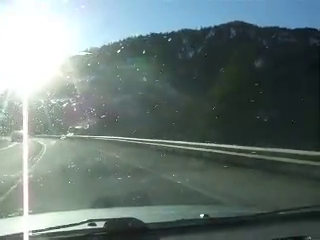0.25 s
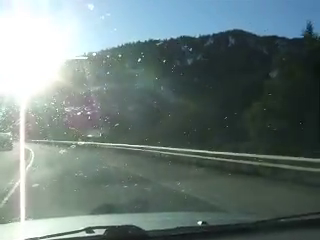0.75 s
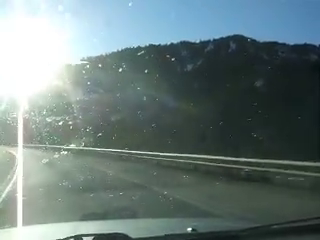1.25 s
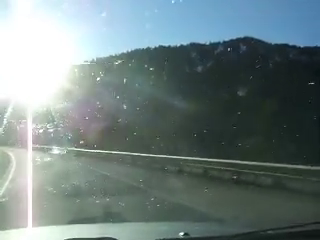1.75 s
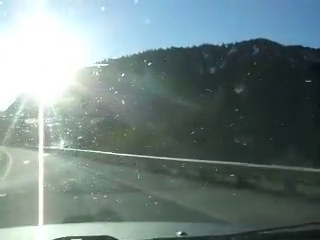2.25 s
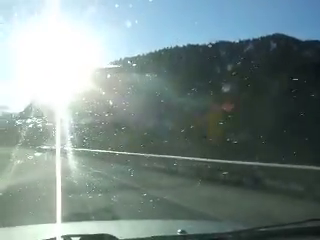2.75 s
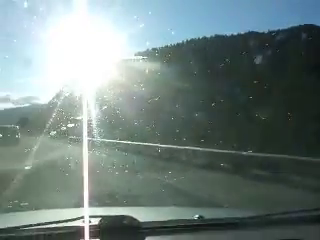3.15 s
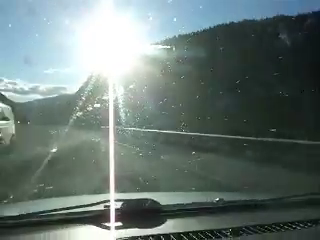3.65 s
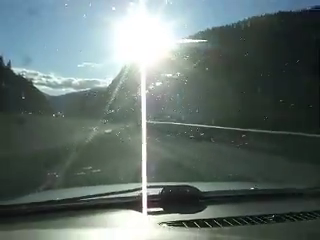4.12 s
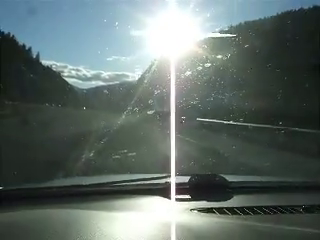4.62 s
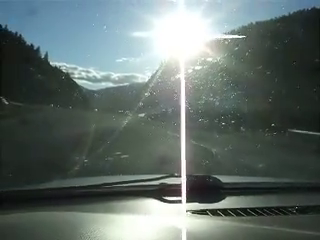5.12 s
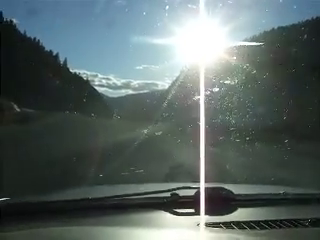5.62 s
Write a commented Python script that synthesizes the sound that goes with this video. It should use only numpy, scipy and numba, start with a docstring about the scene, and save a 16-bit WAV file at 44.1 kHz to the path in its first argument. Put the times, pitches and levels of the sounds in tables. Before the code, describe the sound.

From the start, loud wind and road noise fills a car cabin through an open window, captured by a small camera with a dulled top end. It is a broad, rough rumble and hollow roar with weaker hiss, fluttering quickly; a low engine hum sits half buried. The rush sags slightly around 0.7 and 1.2 seconds, then a cluster of gusts bursts at about 1.7 to 1.9. Smaller gusts follow near 2.5 and 2.7. From 2.8 the level ducks and recovers in uneven pulses, with a low gust near 3.4. Around 3.8 it drops again, with sharp, short gusts up to 4.0. At about 4.5 the strongest surge abruptly chokes the sound, leaving thin faint hiss near 4.65. The roar swells back over the following half second or so, with smaller dips around 4.8 to 5.3, then continues somewhat weaker, with faint gusts near 5.7, until the cut at six seconds.

```python
"""Wind rushes and hisses unevenly through the open window of a car on a highway, heard on a small camera inside.
Filtered noise in three eddy sizes rings the cabin's resonances; gusts add short noise bands, a sine hums as engine.
In surges a decaying sine of about 17 Hz throbs through the cabin, too low to hear.
It drives the camera's gain control, so the rush ducks abruptly and swells back over a faint, thin hiss."""
import sys
import numpy as np
from scipy import signal
from scipy.fft import rfft, irfft
from scipy.io import wavfile
from scipy.ndimage import uniform_filter1d
from numba import njit

SR = 44100
rng = np.random.default_rng(int(sys.argv[2]) if len(sys.argv) > 2 else 0)


def int16_out(signal):
    """Quantize to a 16-bit WAV file."""
    q = np.round(np.clip(np.atleast_2d(signal).T, -1, 1) * 32767)
    wavfile.write(sys.argv[1], SR, q.astype(np.int16))


N = 259308


def undb(db):
    """Decibels to amplitude gain."""
    return 10 ** (np.asarray(db) / 20)


def seconds():
    """Time of each sample, s."""
    return np.arange(N) / SR


def walk(rate_hz):
    """Random levels held 1 / rate_hz s and slewed twice; spread near 1."""
    hold_samples = int(SR / rate_hz)
    held = rng.standard_normal(N)[np.arange(N) // hold_samples]
    slewed = uniform_filter1d(held, hold_samples)
    return 1.3 * uniform_filter1d(slewed, hold_samples)


def bins():
    """Frequency of each spectral line, Hz; the zero line is set to one bin's width."""
    return np.maximum(np.arange(N // 2 + 1), 1) * SR / N


def slope(points):
    """Spectrum in dB from (f/Hz, level/dB) points, joined on a log-frequency axis."""
    hz, db = np.transpose(points)
    return np.interp(np.log(bins()), np.log(hz), db)


def bell(x, centre, width):
    """Gaussian hump of height 1; width is two standard deviations."""
    return np.exp(-2 * ((x - centre) / width) ** 2)


def below(hz, order):
    """Butterworth low-pass gain."""
    return 1 / np.sqrt(1 + (bins() / hz) ** (2 * order))


def above(hz, order):
    """Butterworth high-pass gain."""
    return 1 / np.sqrt(1 + (hz / bins()) ** (2 * order))


def noise(gain):
    """Gaussian noise with the given amplitude per root Hz."""
    spectrum = rfft(rng.standard_normal(N)) * gain
    return irfft(spectrum, N) * np.sqrt(SR / 2)


def background_hiss():
    """Faint, thin hiss: noise shaped by a fixed spectrum."""
    # noise density: f/Hz, level/dB per Hz
    floor = [(300, -99), (3000, -95), (4600, -96.5), (7500, -95.5)]
    return noise(undb(slope(floor)))


def engine(wander=.02, waver_db=-4.0):
    """Firing note of the cruising engine: a sine of wandering pitch and level, half buried in the wind."""
    centre_hz, rms_db = 112.4, -39.5
    hz = centre_hz * (1 + wander * walk(10))
    level = undb(rms_db + waver_db * walk(3.7))
    return level * np.sqrt(2) * np.sin(2 * np.pi * np.cumsum(hz) / SR)


def gusts():
    """Each gust swells and fades as a noise band, from a narrow howl to a broad hiss, under a bell envelope."""
    # gusts: t/s, envelope standard deviation/s, f/Hz, width/Hz, level/dB
    bursts = [(1.678, 0.08, 209, 69.4, -24), (1.714, 0.057, 1840, 4600, -31.5),
              (1.739, 0.077, 800, 400, -27), (1.92, 0.11, 2010, 590, -42), (1.923, 0.055, 670, 202, -27.5),
              (2.466, 0.13, 331, 160, -30), (2.737, 0.019, 3570, 1700, -37), (3.37, 0.079, 191, 90, -22),
              (3.64, 0.07, 3300, 900, -45), (3.801, 0.015, 3550, 1700, -35.5),
              (4.004, 0.022, 1880, 1600, -29.5), (4.021, 0.058, 874, 396, -24),
              (4.34, 0.099, 3270, 800, -46), (5.654, 0.096, 395, 110, -38), (5.72, 0.1, 2500, 894, -46)]
    out = np.zeros(N)
    for centre_s, sigma_s, hz, width_hz, db in bursts:
        band = noise(bell(bins(), hz, width_hz))
        envelope = bell(seconds(), centre_s, 2 * sigma_s)
        out += undb(db) * band / band.std() * envelope
    return out


def buffet(wander=.12):
    """The cabin is a bottle, the window its neck: each gust starts a new slow, uneven swing of the air inside."""
    # gusts that set the cabin throbbing: t/s, initial swing amplitude/dB, ring-out t60/s
    surges = [(0.233, -3.5, 1.4), (0.535, -2.5, 3.3), (.654, -1, .48), (1.019, -4, 0.76), (1.792, -5, 0.49),
              (2.805, 9, 0.57), (3.162, 5.5, 0.9), (3.302, 5.5, 0.84), (3.81, -0.5, 1.2), (3.842, 11, 0.57),
              (4.4, -3.5, 1.5), (4.435, 7.5, 3.96), (4.521, 18, 2.5), (4.555, 23.5, .62), (4.822, 7, 0.81),
              (4.905, 7.5, 0.55), (5.201, -1, 0.67), (5.292, 5.5, 0.54), (5.407, -0.5, 1.57),
              (5.796, 2, 0.77)]
    centre_hz, width_hz, rest_db, takeover_s = 17.2, 7.5, -20, .016
    swing = np.zeros(N)
    turns = np.cumsum(centre_hz * (1 + wander * walk(18))) / SR
    for onset_s, db, t60_s in surges:
        age_s = np.maximum(seconds() - onset_s, 0)
        start = np.argmax(age_s > 0)
        # the gust pushes the way the air is already moving
        push = np.copysign(1, swing[start] - swing[start - 1])
        decay = np.exp(-np.log(1000) * age_s / t60_s)
        ring = push * undb(db) * decay * np.sin(2 * np.pi * (turns - turns[start]))
        # the new swing replaces the old
        swing += np.minimum(age_s / takeover_s, 1) * (ring - swing)
    # turbulence keeps the same resonance stirring throughout
    stir = noise(bell(bins(), centre_hz, width_hz))
    return swing + undb(rest_db) * stir / stir.std()


def churning(swing):
    """The throb churns the air: smoothed swing size, levelling off at 1."""
    level_off_db, settle_s = -8, 0.09
    keep = np.exp(-1 / (settle_s * SR))
    size = signal.lfilter([1 - keep], [1, -keep], np.abs(swing))
    return np.tanh(size / undb(level_off_db))


def rush(swing, shared_db=0.25, flicker_db=.5, flutter_db=0.91, lowest_hz=30):
    """Large eddies rumble, middling ones roar, small ones hiss: noise bands coloured by the cabin's resonances."""
    # airflow at the window: t/s, strength/dB
    flow = [(0, 1), (.38, 1), (.65, -3), (.9, -0.34), (1.2, -2.5), (1.55, 2.4), (1.72, 3), (1.85, -0.4),
            (2.55, .3), (2.8, 2), (3.2, 2), (3.6, -0.5), (4.0, 4.5), (4.2, -3.5), (4.45, 1.5), (4.8, 4),
            (5.15, -2), (5.75, -3)]
    # turbulence and road noise: f/Hz, level/dB per Hz
    air = [(30, -35.5), (65, -45.5), (140, -52), (280, -56), (500, -61.5), (900, -67), (1450, -78),
           (2600, -77), (4500, -82), (7400, -89)]
    # resonances of cabin and window gap: f/Hz, width/Hz, lift/dB
    cabin = [(45.4, 17, 5), (115.6, 14.5, 8), (193.6, 60.6, 5.5), (341.3, 15, 5.5), (395.6, 45, 4.5),
             (567, 62, 3), (677, 37, 3.5), (743, 110, 4), (997.5, 72, 8.5), (1120, 111, 9), (1302, 110, 5),
             (1578, 51, 4), (1966, 47, 4), (1820, 690, 3.5), (2280, 86, 2.5), (2845, 64, 4),
             (3220, 250, 3.5), (3540, 430, 2.5), (5370, 130, 3)]
    # eddies, large to small: level/dB, follow/dB per dB of airflow, lift at full churning/dB,
    # drift as the car leaves the bend/dB per s
    eddies = [(-2, 0.48, 5, -0.14), (0.61, 1.05, -0.44, -.5), (-1, 1.2, 1, .1)]
    rumble_top_hz, hiss_from_hz = 275, 1680

    resonances_db = sum(db * bell(bins(), hz, width_hz) for hz, width_hz, db in cabin)
    colour = undb(slope(air) + resonances_db)
    bands = (above(lowest_hz, order=4) * below(rumble_top_hz, order=4),
             above(rumble_top_hz, order=4) * below(hiss_from_hz, order=4),
             above(hiss_from_hz, order=4))
    t = seconds()
    flow_s, strength_db = np.transpose(flow)
    flow_db = np.interp(t, flow_s, strength_db)
    churn = churning(swing)
    # eddies tearing off the window frame roughen the whole rush
    surge_db = shared_db * walk(24.91) + flutter_db * walk(220)
    out = np.zeros(N)
    for band, (db, follow, lift_db, drift_db_per_s) in zip(bands, eddies):
        level_db = db + follow * flow_db + lift_db * churn + drift_db_per_s * t
        # each size also flickers on its own
        out += noise(colour * band) * undb(level_db + surge_db + flicker_db * walk(50))
    return out


@njit
def hold(size, fall):
    """Peak follower: rises at once, decays by the factor fall per sample."""
    out, e = np.empty(len(size)), 0.
    for i in range(len(size)):
        e = max(size[i], e * fall)
        out[i] = e
    return out


def gain_control(pressure):
    """Gain that turns slow pressure peaks down to a ceiling, then recovers at a steady dB rate."""
    ceiling_db, release_db_per_s, attack_s = -9.5, 74.5, 0.0026
    attack = max(1, int(attack_s * SR))
    slow = uniform_filter1d(pressure, attack)
    peak = hold(np.abs(slow), float(undb(-release_db_per_s / SR)))
    return uniform_filter1d(np.minimum(1, undb(ceiling_db) / (peak + 1e-9)), attack)


def brief_dip():
    """Gain of a brief dip of the whole sound in the strongest surge."""
    # t/s, width/s, depth/dB
    centre_s, width_s, depth_db = (4.658, .02, -10)
    return undb(depth_db * bell(seconds(), centre_s, width_s))


def scene():
    """Pressure inside the cabin: the sum of rush, gusts, throb and engine."""
    swing = buffet()
    return (rush(swing) + gusts() + swing + engine())[None]


def record(dry):
    """Gain control acts first; a faint hiss is added, then the level dips, the ends fade and the top is cut."""
    soft_top_hz, top_hz, fade_s = 7736, 8600, .006
    sound = (dry * gain_control(dry[0]) + background_hiss()) * brief_dip()
    t = seconds()
    fade = np.minimum(np.minimum(t, t[::-1]) / fade_s, 1)
    top_cut = below(soft_top_hz, order=18) * below(top_hz, order=60)
    return irfft(rfft(sound * fade) * top_cut, N)


dry = scene()
out = record(dry)
int16_out(out)
```